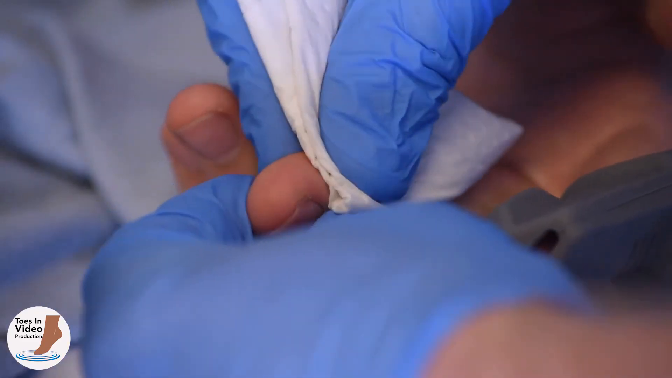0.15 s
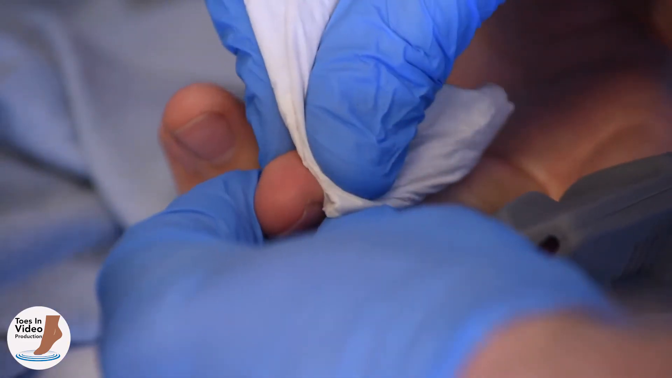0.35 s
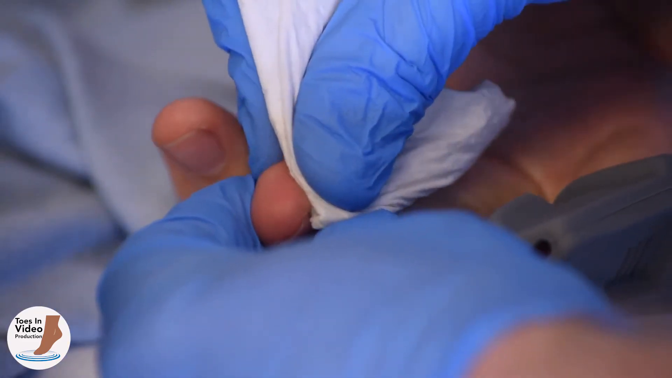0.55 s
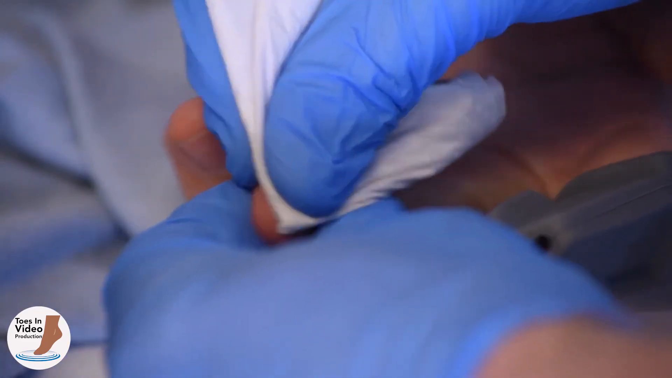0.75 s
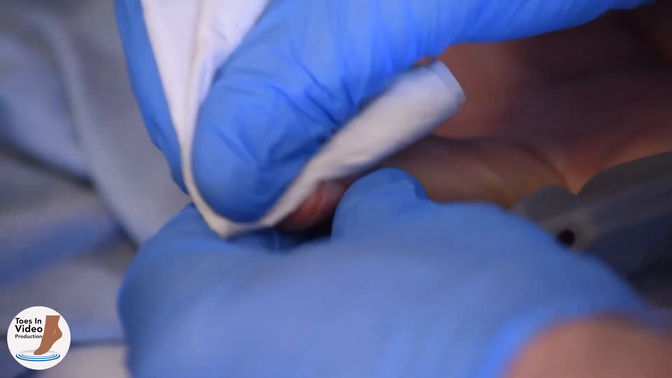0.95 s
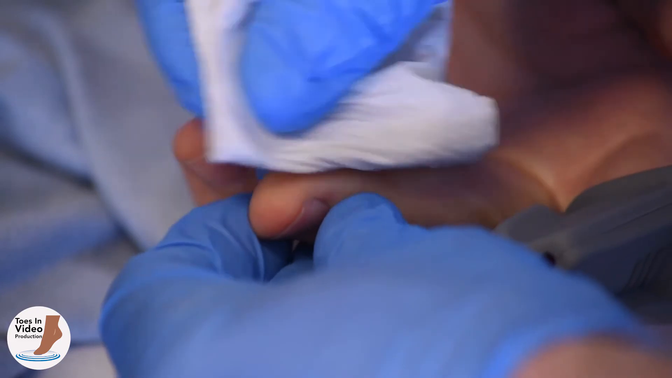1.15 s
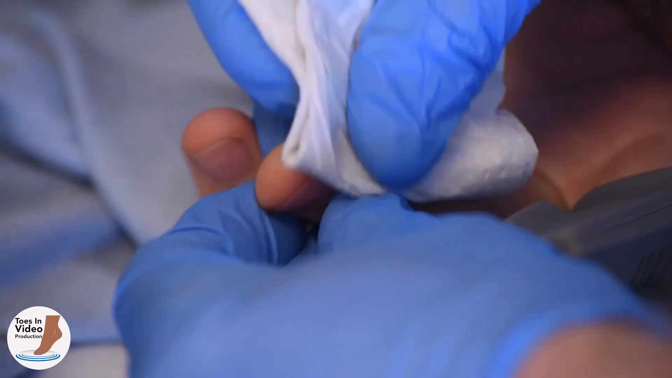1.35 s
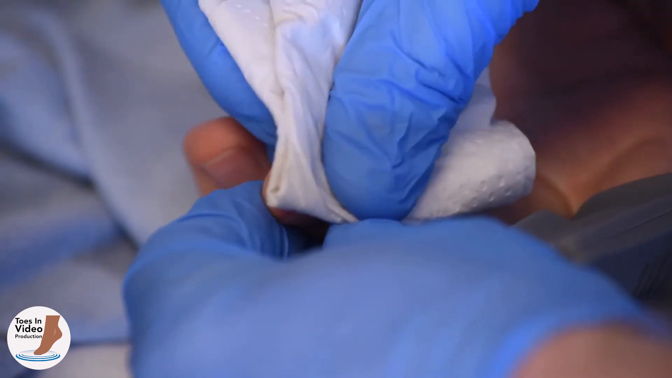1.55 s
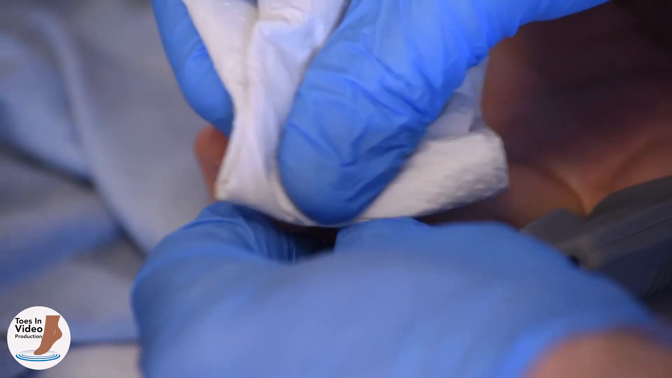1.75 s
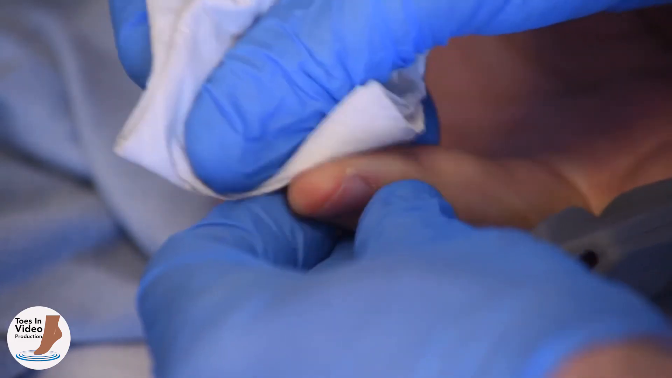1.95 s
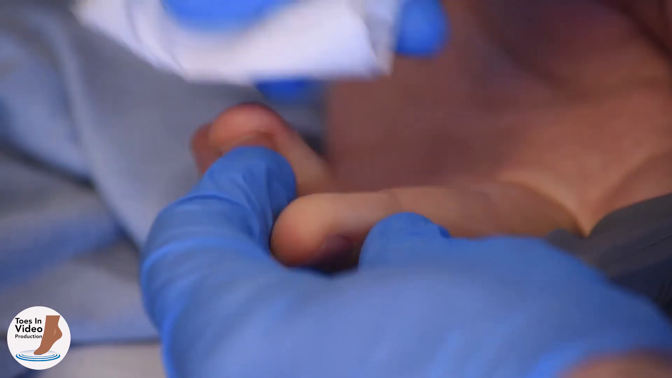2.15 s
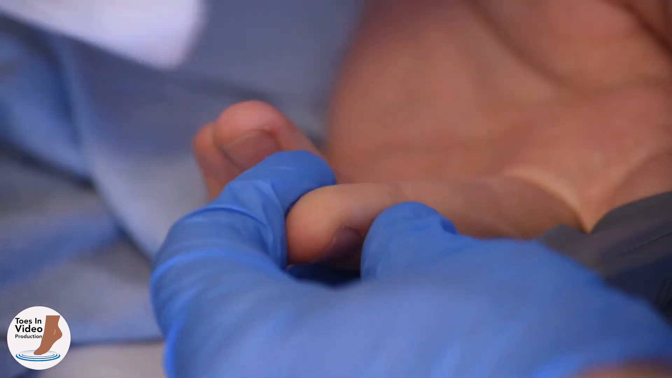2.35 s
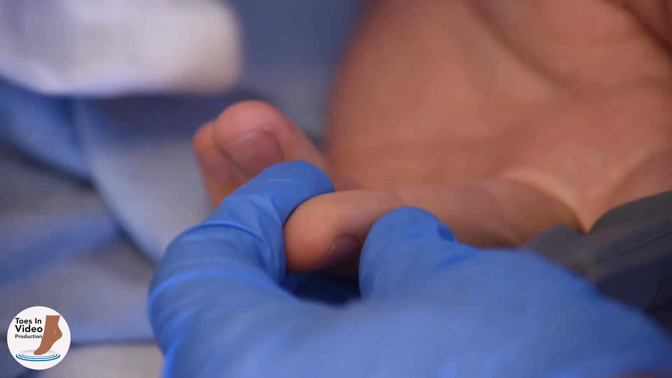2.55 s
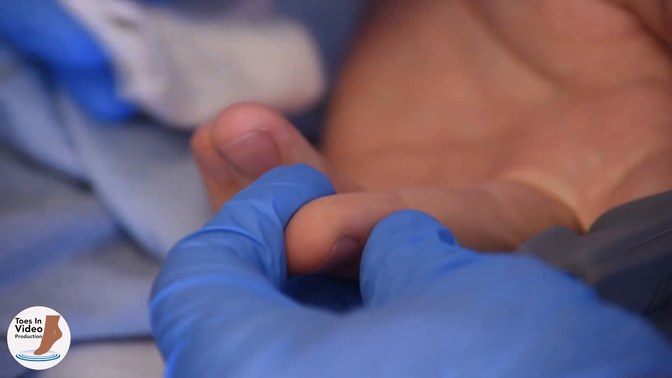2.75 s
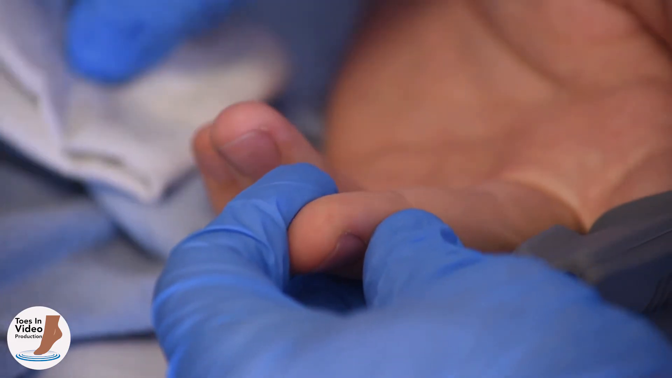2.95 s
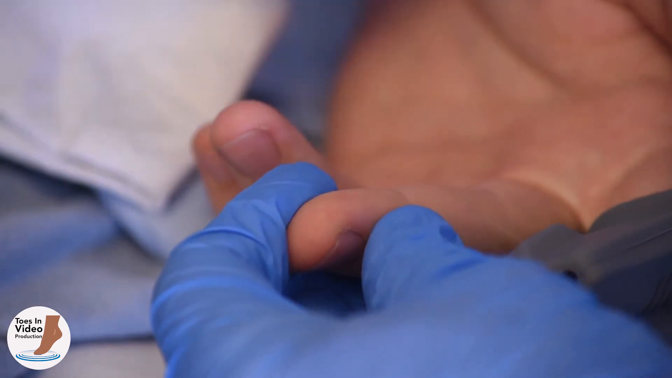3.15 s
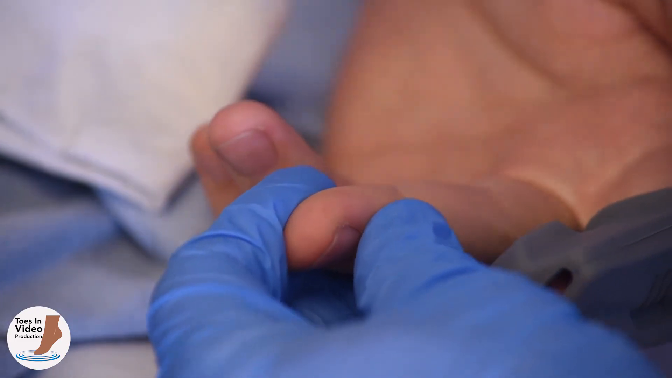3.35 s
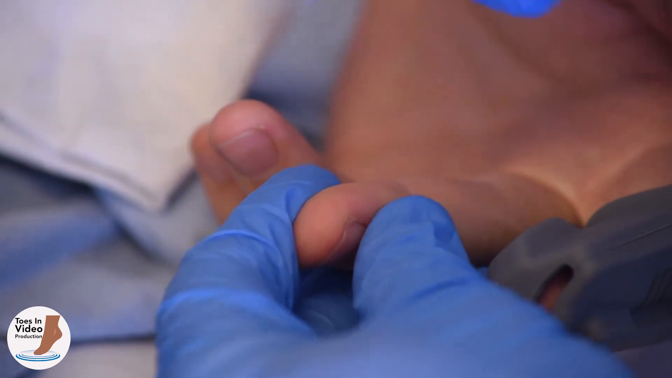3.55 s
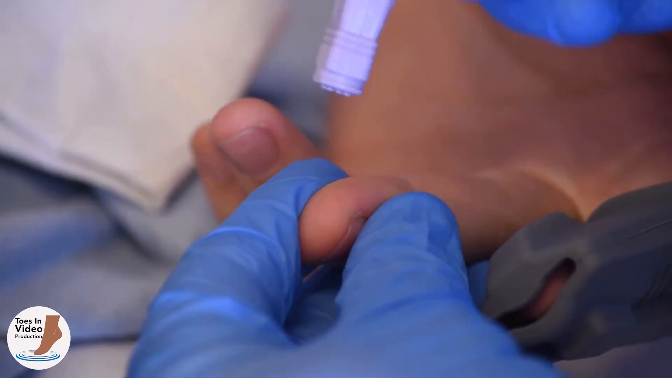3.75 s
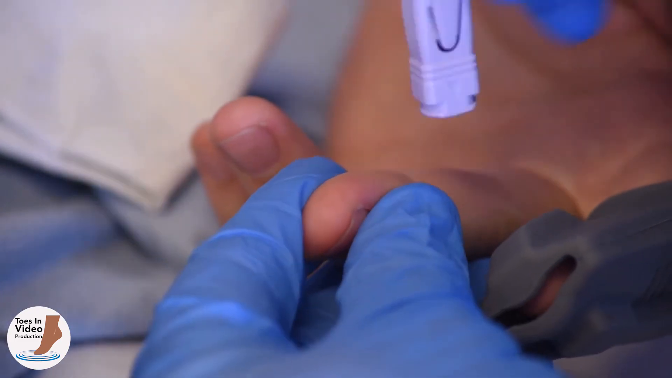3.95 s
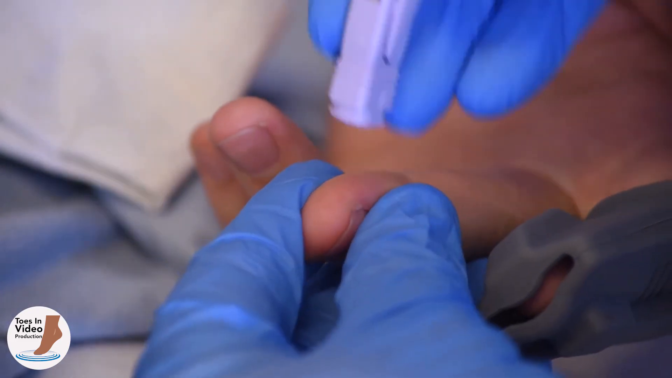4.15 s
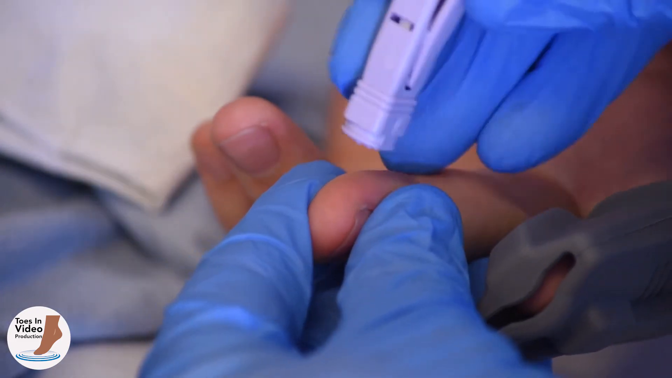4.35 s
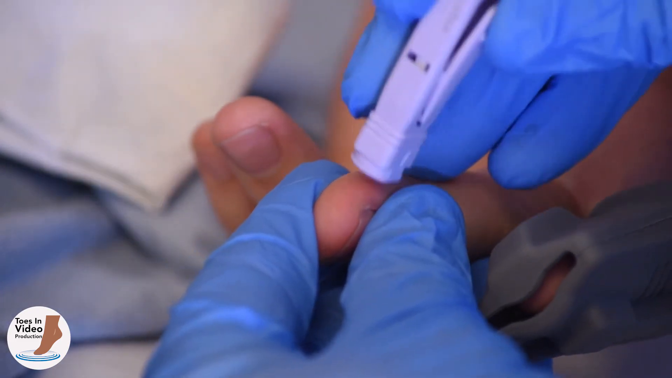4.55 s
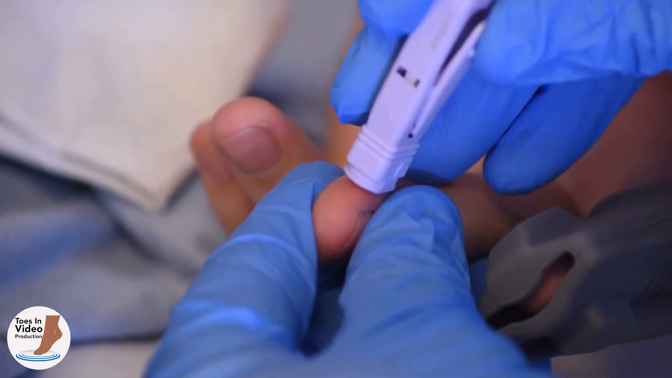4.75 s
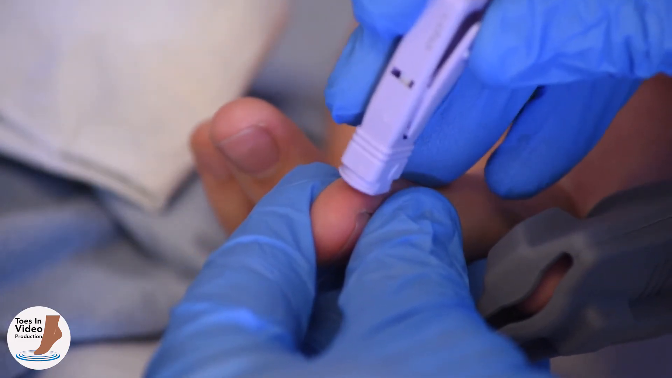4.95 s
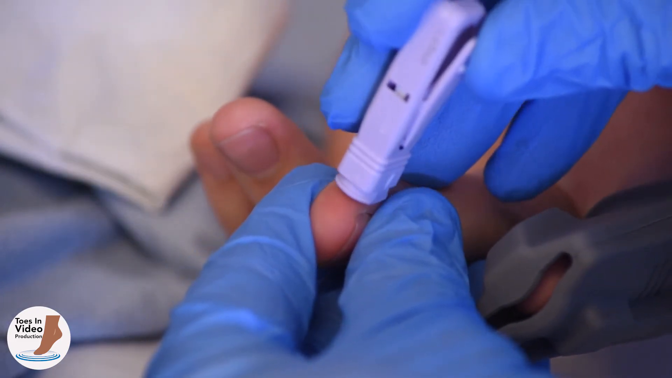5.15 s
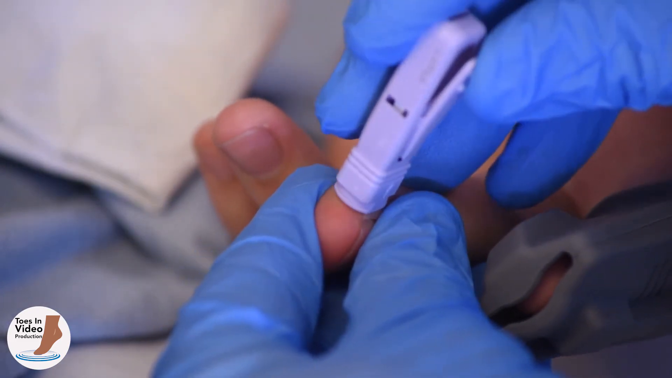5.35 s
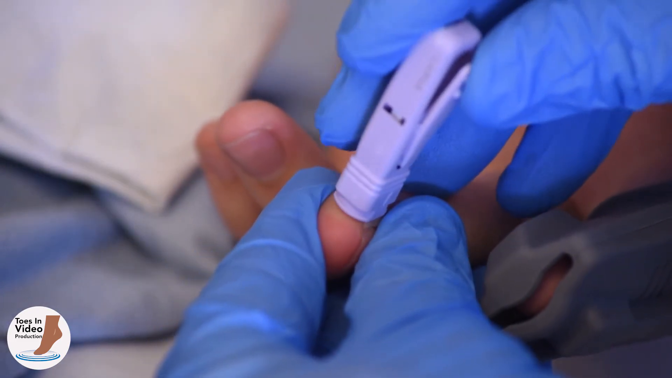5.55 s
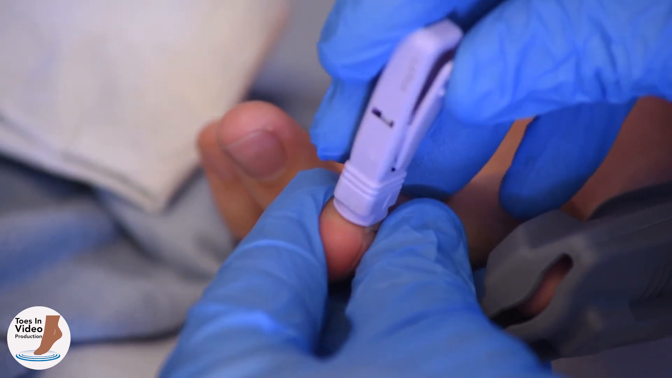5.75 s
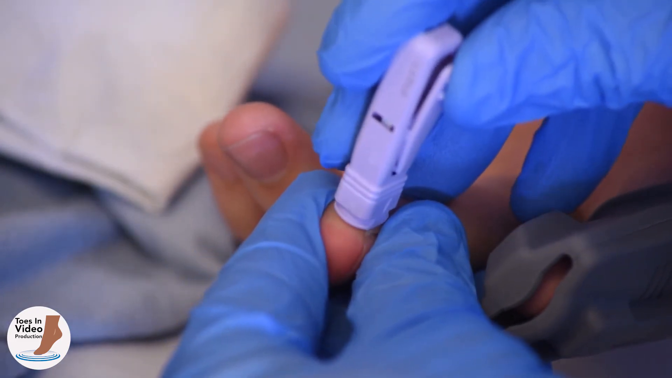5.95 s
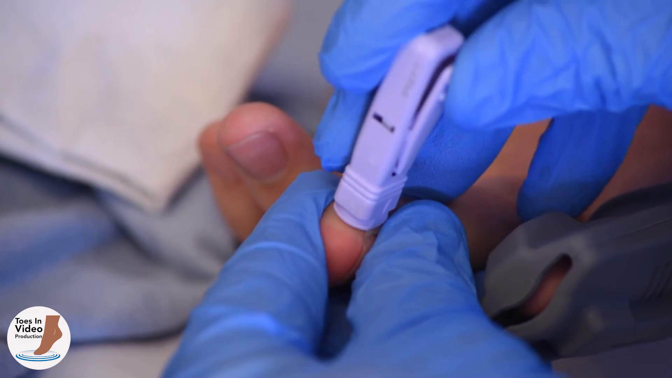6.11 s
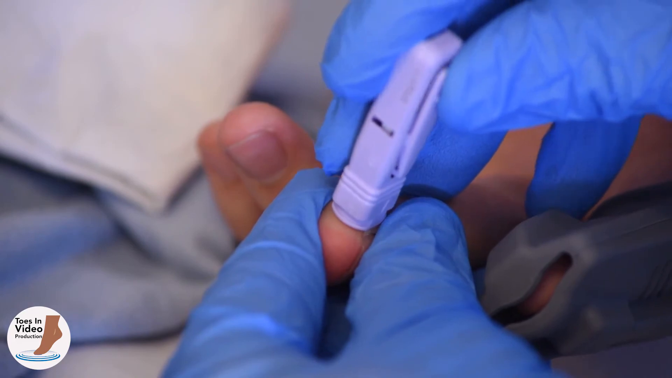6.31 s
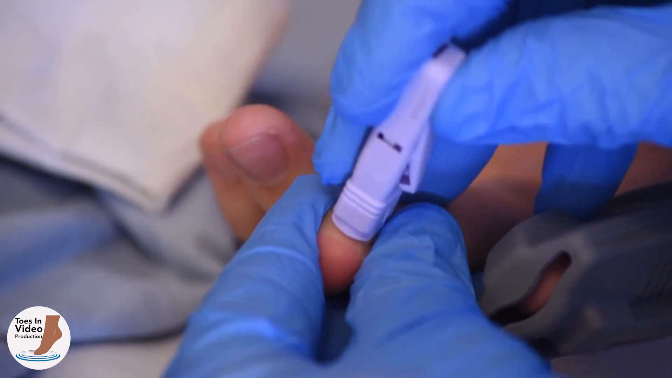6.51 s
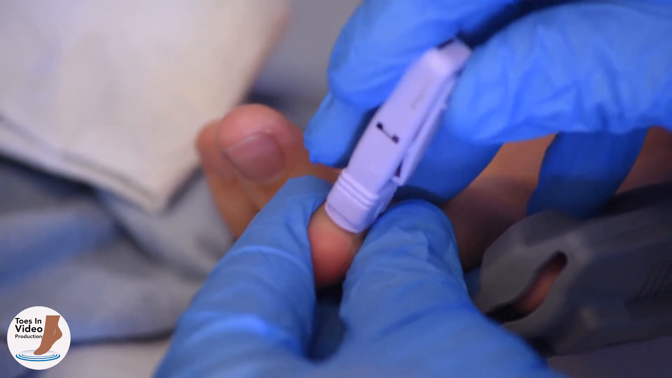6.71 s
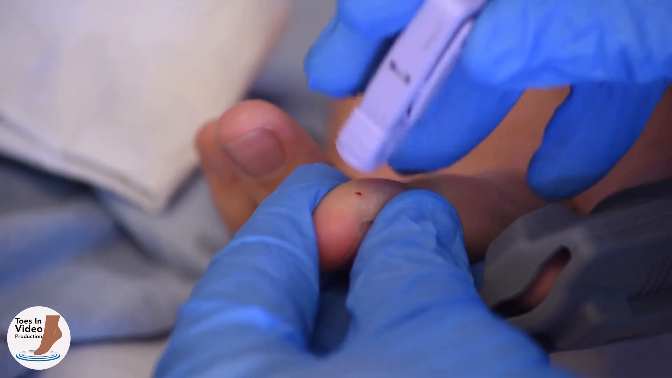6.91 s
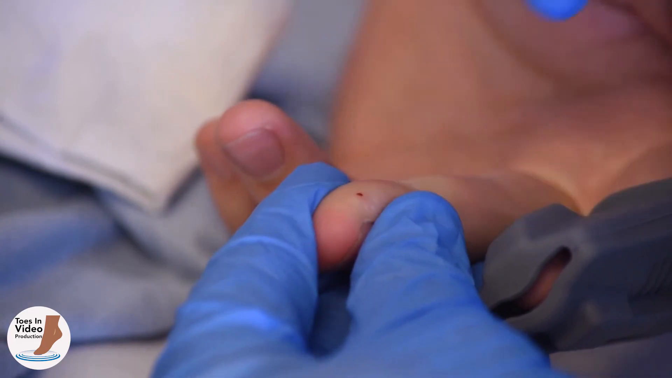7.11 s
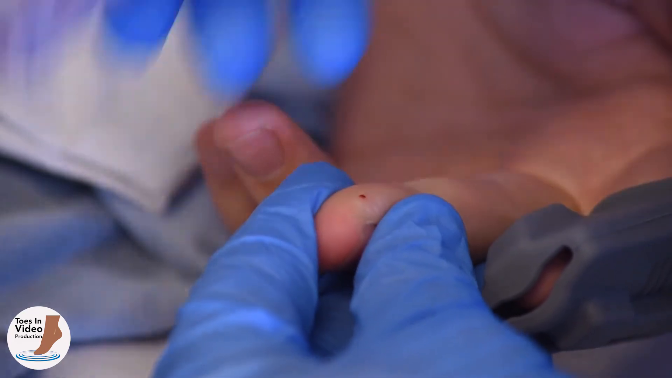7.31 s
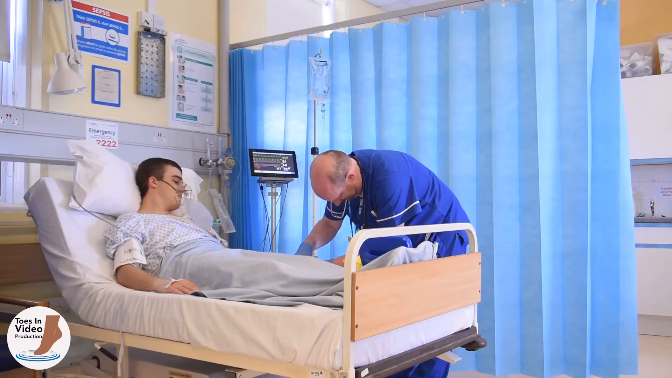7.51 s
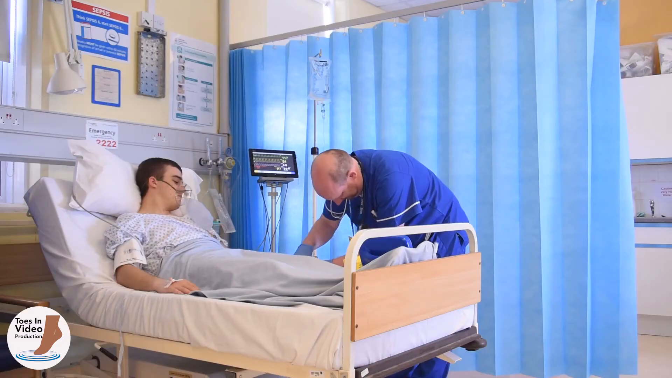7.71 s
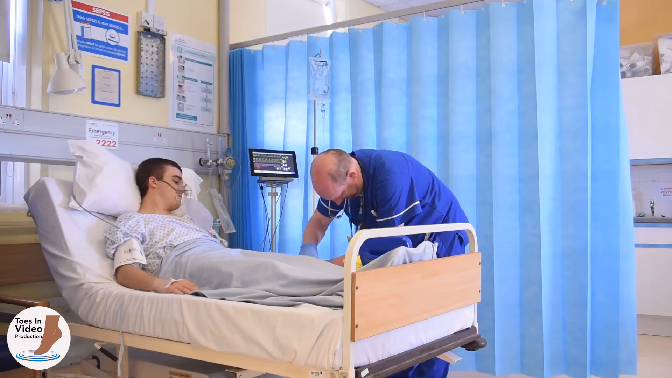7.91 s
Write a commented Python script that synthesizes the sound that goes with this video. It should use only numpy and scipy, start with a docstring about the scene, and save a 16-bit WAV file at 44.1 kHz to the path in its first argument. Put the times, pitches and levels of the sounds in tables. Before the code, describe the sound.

A close stereo microphone in a small quiet ward room picks up high, slightly whistling hiss over soft air rumble. First come light wipes of gauze, tiny glove ticks and muffled low bumps, then a small tick and brush as a device is brought over. Much later one loud, dry plastic-and-spring click snaps out, rings for an instant and fades, leaving hiss and a faint low knock.

```python
"""Spring lancet firing in a quiet ward room

A spring-loaded plastic lancet fires once, close by: latch and plunger strike its casing within
milliseconds, ringing damped modes; delayed copies and a fading noise tail make the room's reply.
Around it: noise shaped by fixed resonances (hiss, faint whistles), ventilation noise with a hum,
band-passed rustles and ticks of gloves and gauze, low-noise thuds, and a hollow bump with its rebound."""
import sys
import numpy as np
from scipy import signal
from scipy.fft import rfft, irfft
from scipy.io import wavfile
from scipy.ndimage import uniform_filter1d

SR = 44100
rng = np.random.default_rng(int(sys.argv[2]) if len(sys.argv) > 2 else 0)


def wrap_up_sound(samples):
    """Save the sound to the file named by the first command line argument, as 16-bit audio."""
    columns = np.atleast_2d(samples).T
    # keep every value between -1 and 1, then stretch to whole-number steps
    tamed = np.clip(columns, -1, 1)
    steps = np.round(tamed * 32767).astype(np.int16)
    wavfile.write(sys.argv[1], SR, steps)


N = 351918
TIME = np.arange(N) / SR
FREQ = np.fft.rfftfreq(N, 1 / SR) + 1e-3  # offset avoids log(0)

# Parts of the click: latch, plunger at its stop, rebounds, and last a weak, thin near reflection
# of the click. Each row: start in seconds, spring relative level in dB, spring pitch in Hz,
# casing relative level in dB, casing tilt in dB per octave, crack relative level in dB.
CLICK_PARTS = [(6.440384, -9.7, 9545, 1.6, -4.5, -7.8), (6.441866, -.7, 10308, 2.1, 1.3, -2),
               (6.442376, -2.4, 10162, -3.2, 3.9, -6.9), (6.443444, -8.3, 9407, -2, .5, -1.2),
               (6.44379, -2.9, 9381, -14, 1.5, -5.5), (6.446542, -12.5, 9963, -19.7, 1.9, -12.7)]
PLUNGER_STOP_S = CLICK_PARTS[1][0]


def undb(db):
    """Decibels to gain."""
    return 10 ** (np.asarray(db) / 20)


def unit(x):
    """Scale to rms 1."""
    return x / np.sqrt(np.mean(x ** 2))


def add(out, start_s, x):
    """Mix x into out from start_s."""
    i = int(start_s * SR)
    out[..., i:i + x.shape[-1]] += x[..., :N - i]


def curve(points):
    """Gain at every FREQ from (Hz, dB) points, interpolated over log frequency."""
    hz, db = np.transpose(points)
    return undb(np.interp(np.log(FREQ), np.log(hz), db))


def resonances(modes):
    """Gain at every FREQ of steep (Hz, width Hz, dB) resonances, summed in power."""
    power = 0
    for hz, width_hz, db in modes:
        detune = (FREQ ** 2 - hz ** 2) / (FREQ * width_hz)
        power = power + (undb(db) / (1 + detune ** 2)) ** 2
    return np.sqrt(power)


def noise(gain, side=0.):
    """Stereo noise of a given colour; side is the gain of the part opposed between the ears."""
    mid, apart = rfft(rng.standard_normal((2, N))) * unit(gain)
    return irfft(np.array([mid + side * apart, mid - side * apart]), N)


def bandpass(x, edges_hz):
    """Second-order Butterworth band-pass."""
    return signal.sosfilt(signal.butter(2, edges_hz, "bandpass", fs=SR, output="sos"), x)


def band(x, hz, octaves):
    """Band-pass around a centre, edges kept within the usable range."""
    half = 2 ** (octaves / 2)
    highest_hz = SR / 2 - np.array([2000, 1000])
    return bandpass(x, np.clip([hz / half, hz * half], 10, highest_hz))


def hiss(db=-47.5, flutter_db=0.58, flutter_rate_hz=20):
    """A steady hiss: broad noise plus fixed narrow resonances, its level fluttering very slightly."""
    # Colour between the resonances. Each row: frequency in Hz, relative level in dB.
    floor_colour = [(1500, -42), (1900, -13), (2600, -15), (3100, -18), (4100, -21), (5400, -30),
                    (7000, -11), (9500, -16), (10400, -17), (14500, -19), (15000, -26), (15400, -60)]
    # Narrow resonances. Each row: frequency in Hz, width in Hz, relative level in dB.
    peaks = [(1610, 290, -17.0), (2080, 100, -15.0), (2290, 140, -9.5), (2430, 80, -7.0),
             (3620, 600, -16.5), (4460, 600, -14.5), (4860, 80, -12.5), (5060, 600, -14.0),
             (5620, 250, -10.5), (5860, 140, -5.5), (6260, 320, -7.5), (6910, 130, -4.0), (7170, 230, -2.0),
             (7430, 180, -5.0), (7680, 50, -10.0), (7970, 110, -6.0), (8580, 360, -4.0), (8870, 510, -13.5),
             (9320, 210, 0.0), (9630, 130, -10.0), (9980, 270, -10.5), (10740, 110, -9.5),
             (11290, 290, -9.5), (11530, 170, -9.5), (11760, 200, -13.5), (12270, 220, -8.0),
             (12770, 150, -11.5), (13300, 140, -15.0), (13750, 310, -16.5), (14220, 80, -14.0)]
    # Difference between the ears. Each row: frequency in Hz, side minus mid in dB.
    side_colour = [(1500, -4.5), (1950, -4), (2400, -19.5), (3000, -37), (3500, -73), (4300, -50),
                   (4800, -9), (5500, -5), (7100, -8), (8000, -9), (9300, -5), (11000, -4.5), (14000, -3.5)]
    # Placement. Each row: frequency in Hz, left minus right in dB.
    pan = [(2400, 0), (4500, -1), (6500, -2), (8000, -3), (9400, -4), (10600, -4.5), (12500, 1), (14000, 1)]
    sound = noise(np.hypot(curve(floor_colour), resonances(peaks)), curve(side_colour))
    lean = np.sqrt(curve(pan))
    panned = irfft(rfft(sound) * np.array([lean, 1 / lean]), N)
    knots_s = np.arange(0, N / SR, 1 / flutter_rate_hz)
    flutter = np.interp(TIME, knots_s, rng.standard_normal(len(knots_s)))
    return panned * undb(db + flutter_db * flutter)


def ventilation(rumble_db=-63, hum_hz=219, hum_db=-73.0, waver_db=-78, waver_width_hz=9):
    """Soft air rumble with a fan hum: a steady tone that narrow noise at its pitch makes waver."""
    # Rumble colour. Each row: frequency in Hz, relative level in dB.
    rumble_colour = [(20, -12), (45, -1.5), (85, 4), (135, 3), (175, -1.5), (260, 0), (310, -5),
                     (560, -6.5), (760, -8.5), (1020, -3.5), (1300, -11), (2500, -25)]
    side = curve([(40, -18.0), (300, -7.0), (1200, -8.5)])
    rumble = undb(rumble_db) * noise(curve(rumble_colour), side)
    hum = undb(hum_db) * unit(np.sin(2 * np.pi * hum_hz * TIME))
    waver = undb(waver_db) * noise(resonances([(hum_hz, waver_width_hz, 0)]), side=.2)
    return rumble + hum + waver


def gloves(brush_s=0.028, grain_db=4.0, octaves=2.2, spread=0.25, tick_octaves=0.43, tick_cycles=9.7):
    """Rubbing is a swell of tiny uneven slips; a crease letting go gives a tick, longer if low."""
    # Longer rubs: the gauze wipes the finger, then is laid aside.
    # Each row: middle in seconds, half-length in seconds, level in dB, centre in Hz.
    rubs = [(1.702, 1.4, -65.5, 1940), (2.717, 0.53, -57, 4400)]
    # Quick brushes of glove and gauze, each of half-length brush_s.
    # Each row: middle in seconds, level in dB, centre in Hz.
    brushes = [(0.905, -61, 480), (0.911, -56, 1110), (1.149, -55, 4000), (2.01, -51.5, 4500),
               (2.246, -53, 6500), (2.36, -47, 4340), (3.979, -52, 7040)]
    # Glove ticks. Each row: start in seconds, level before decay in dB, centre in Hz.
    ticks = [(1.154, -46, 3750), (1.232, -39.5, 2950), (2.234, -40.5, 2460), (2.249, -38, 8050),
             (3.971, -33, 7200), (3.977, -37, 6900)]
    out = np.zeros((2, N))
    strokes = [*rubs, *((middle_s, brush_s, db, hz) for middle_s, db, hz in brushes)]
    for middle_s, half_s, db, hz in strokes:
        n = int(2 * half_s * SR)
        slips = rng.standard_normal(N) + spread * rng.standard_normal((2, N))
        # each slip size holds for 32 samples
        sizes = undb(grain_db * np.repeat(rng.standard_normal(N // 32 + 1), 32)[:n])
        rub = unit(band(slips[:, :n] * sizes, hz, octaves))
        add(out, middle_s - half_s, undb(db) * rub * np.hanning(n))
    t = TIME[:SR // 20]
    for start_s, db, hz in ticks:
        tick = unit(band(rng.standard_normal(len(t)), hz, tick_octaves))
        add(out, start_s, undb(db) * tick * np.exp(-t * hz / tick_cycles))
    return out


def whistles(hz=4867, width_hz=40):
    """A thin, faint whistle of narrow noise that swells out of the hiss and sinks back."""
    # Each row: middle in seconds, half-length in seconds, level before the swell in dB.
    swells = [(0.505, 0.062, -62), (1.026, 0.098, -60)]
    out, tone = np.zeros((2, N)), noise(resonances([(hz, width_hz, 0)]), side=0.4)
    for middle_s, half_s, db in swells:
        start_s = middle_s - half_s
        i, n = int(start_s * SR), int(2 * half_s * SR)
        add(out, start_s, undb(db) * unit(tone[:, i:i + n]) * np.hanning(n))
    return out


def thuds(knock_s=0.031, onset_s=0.0073, knock_low_hz=40, knock_high_hz=1000,
          thump_db=0, thump_hz=90, thump_lag_s=0.0176,
          boom_lag_s=0.031, swell_s=0.0092, sag_db_per_s=24, release_s=0.047):
    """Distant thuds, lows late: a muffled knock, one deep thump, then a boom that sags and stops."""
    # Each row: start in seconds, knock level in dB, boom level in dB, boom hold in seconds.
    events = [(1.892, -49, -52, 0.11), (2.18, -75, -59, 0.11), (2.452, -47.5, -54.5, 0.12),
              (2.734, -47, -49, 0.42)]
    # Knock colour. Each row: frequency in Hz, relative level in dB.
    knock_colour = [(30, -18), (70, 2), (130, 2), (220, 0), (320, -5), (500, -6), (750, -12), (1200, -14),
                    (2500, -28)]
    # Boom colour. Each row: frequency in Hz, relative level in dB.
    boom_colour = [(20, -17), (38, -15), (53, 10), (64, -8), (88, -7.5), (140, -22), (400, -32),
                   (1200, -32), (6000, -88)]

    def steadied(x, window):
        """Even out gusts by dividing by the running rms."""
        return x / np.sqrt(uniform_filter1d(np.mean(x ** 2, axis=0), window))

    out = np.zeros((2, N))
    knock = steadied(noise(curve(knock_colour), side=0.16), SR // 50)
    boom = steadied(noise(curve(boom_colour), side=0.02), SR // 16)
    muffled = bandpass(knock, [knock_low_hz, knock_high_hz])
    for start_s, knock_db, boom_db, hold_s in events:
        t = np.maximum(TIME - start_s, 0)
        out += undb(knock_db) * muffled * (1 - np.exp(-t / onset_s)) * np.exp(-t / knock_s)
        # the thump is one inverted Ricker pulse
        turn = (np.pi * thump_hz * (TIME - start_s - thump_lag_s)) ** 2
        out += undb(knock_db + thump_db) * (2 * turn - 1) * np.exp(-turn)
        t = np.maximum(TIME - start_s - boom_lag_s, 0)
        swell = (1 - np.exp(-t / swell_s)) ** 2
        release = np.exp(-np.maximum(t - hold_s, 0) / release_s)
        out += boom * swell * undb(boom_db - sag_db_per_s * t) * release
    return out


def lancet(spring_db=0.3, spring_width_hz=340, spring_rise_s=0.00017,
           casing_db=-6, tilt_pivot_hz=7000, crack_db=-15.5, crack_s=0.0012,
           right_db=5.8, right_lead_s=0.000012):
    """Blows crack at the contact and ring spring and casing modes; a near reflection is built alike."""
    # Casing modes. Each row: frequency in Hz, width in Hz, relative level in dB.
    casing_modes = [(1880, 450, -36), (2710, 600, -29), (3440, 630, -19), (4020, 490, -16),
                    (4500, 530, -12), (5690, 640, -13), (6305, 490, -14), (6730, 110, -12), (8220, 120, -6),
                    (10315, 470, -9), (11420, 430, -19), (13370, 740, -9), (13950, 380, -10),
                    (15350, 350, -20)]
    # Bare contact crack colour. Each row: frequency in Hz, relative level in dB.
    crack_colour = [(170, -6), (420, -21), (750, -17), (1300, -18), (2000, -24), (2600, 1), (3300, 1.5),
                    (6000, 16), (10000, 10), (14000, 3), (16000, -10)]
    out, t = np.zeros((2, N)), TIME[:SR // 20]
    grit = noise(curve(crack_colour), side=0.61)
    crack_decay = np.exp(-t / crack_s)
    mean_width_hz = np.mean([width_hz for _, width_hz, _ in casing_modes])
    facing = undb(np.array([[-right_db], [right_db]]) / 2)  # spring only

    def mode(age, hz, width_hz):
        """One dying vibration; a wider resonance dies sooner."""
        return np.exp(-np.pi * width_hz * age) * np.sin(2 * np.pi * hz * age)

    for k, (start_s, twang_db, spring_hz, shell_db, tilt_db, contact_db) in enumerate(CLICK_PARTS):
        # sub-sample time since the start; spring and casing reach the right ear first
        sample_offset_s = int(start_s * SR) / SR - start_s
        age = np.maximum(t + sample_offset_s - np.array([[right_lead_s], [0]]), 0)
        crack = grit[:, k * len(t):(k + 1) * len(t)] * crack_decay
        crack = unit(crack) * np.sqrt(np.mean(crack_decay ** 2))  # equal energy before levels
        spring = facing * mode(age, spring_hz, spring_width_hz) * (1 - np.exp(-age / spring_rise_s))
        casing = 0
        for m, (hz, width_hz, db) in enumerate(casing_modes):
            gain = undb(db + tilt_db * np.log2(hz / tilt_pivot_hz)) * width_hz / mean_width_hz
            casing = casing + (-1) ** m * gain * mode(age, hz, width_hz)
        add(out, start_s, undb(spring_db + twang_db) * spring
            + undb(casing_db + shell_db) * casing
            + undb(crack_db + contact_db) * crack)
    return out


def recoil(db=-36, hz=45, decay_s=0.0036, right_db=13, jolt_db=-27, jolt_s=0.00015, nudge_s=0.002):
    """The plunger's stop jolts the body, then nudges the fingertip: a damped low swing to the right."""
    out, t = np.zeros((2, N)), TIME[:SR // 10]
    jolt = -undb(jolt_db) * (1 - t / jolt_s) * np.exp(-t / jolt_s)
    swing = -undb(db) * np.sin(2 * np.pi * hz * t) * np.exp(-t / decay_s)
    add(out, PLUNGER_STOP_S, jolt)
    add(out, PLUNGER_STOP_S + nudge_s, swing * undb(np.array([[-right_db], [right_db]]) / 2))
    return out


def room(click, tail_db=-30.0, t60_s=0.36, build_s=0.0015, grain_db=2.0, grain_s=0.0015):
    """Near surfaces echo the click; sound from all sides blends into a grainy tail, unlike at each ear."""
    # Echoes off nearby surfaces. Each row: delay in seconds, level in dB.
    echoes = [(.008, -17), (.013, -28), (.016, -20), (.0194, -22)]
    # Tail colour. Each row: frequency in Hz, relative level in dB.
    tail_colour = [(500, -32), (1400, -34), (2000, -26), (3000, -15.5), (4000, -13), (5000, -10),
                   (5800, -7), (8000, -5.5), (9000, -4), (9900, -1), (10600, -4), (12200, -11),
                   (13500, -13), (15500, -22), (16000, -37)]
    out, t = np.zeros((2, N)), np.maximum(TIME - PLUNGER_STOP_S, 0)
    for delay_s, db in echoes:
        for ear, direct in zip(out, click):
            jitter_s = .0002 * rng.standard_normal()
            add(ear, delay_s + jitter_s, undb(db) * direct)
    # reflections arrive in uneven clumps
    grain = np.interp(t / grain_s, np.arange(N), rng.standard_normal(N))
    clumps = unit(undb(grain_db * grain))
    fade = (1 - np.exp(-t / build_s)) * np.exp(-np.log(1000) * t / t60_s)
    return out + undb(tail_db) * noise(curve(tail_colour), side=1) * clumps * fade


def bumps(hz=232, rise_s=0.0041, decay_s=0.0068):
    """A soft bump and its rebound ring one low, hollow, quickly damped note."""
    # Each row: start in seconds, peak level in dB.
    hits = [(7.917, -47), (7.944, -53)]
    out, t = np.zeros((2, N)), TIME[:SR // 10]
    ring = np.sin(2 * np.pi * hz * t) * (1 - np.exp(-t / rise_s)) * np.exp(-t / decay_s)
    ring = ring / np.max(np.abs(ring))
    for start_s, db in hits:
        add(out, start_s, undb(db) * ring)
    return out


def scene():
    """The click in its room over the quiet background."""
    background = hiss() + ventilation() + gloves() + whistles() + thuds() + bumps()
    click = lancet()
    return background + click + recoil() + room(click)


def record(dry, top_hz=16200):
    """The recorder cuts the top with a steep elliptic low-pass."""
    return signal.sosfilt(signal.ellip(8, .2, 70, top_hz, fs=SR, output="sos"), dry)


dry = scene()
out = record(dry)
wrap_up_sound(out)
```